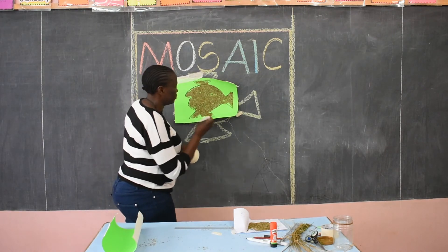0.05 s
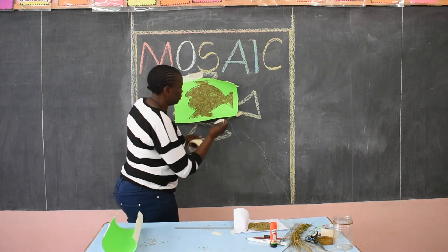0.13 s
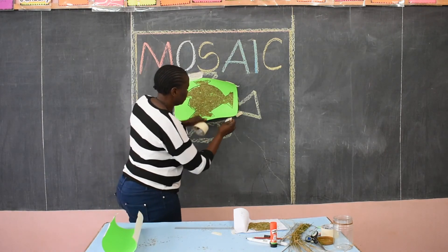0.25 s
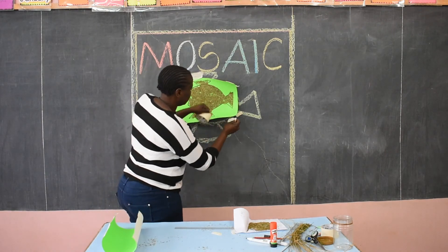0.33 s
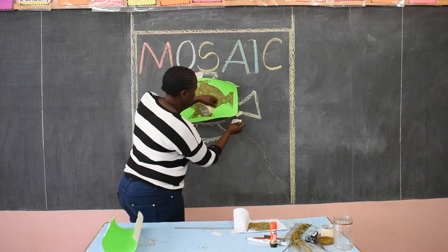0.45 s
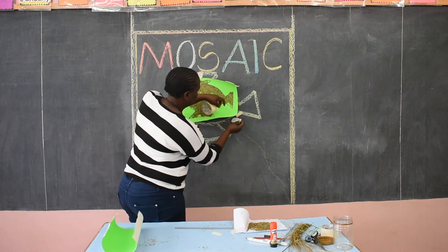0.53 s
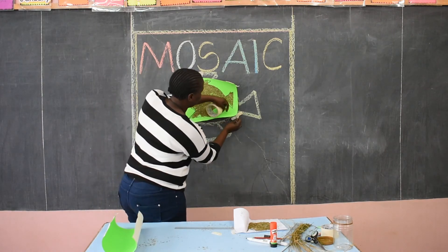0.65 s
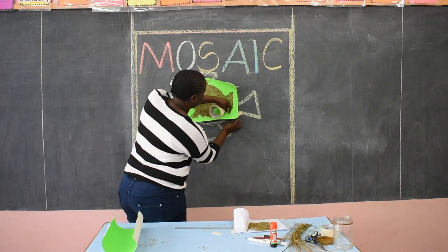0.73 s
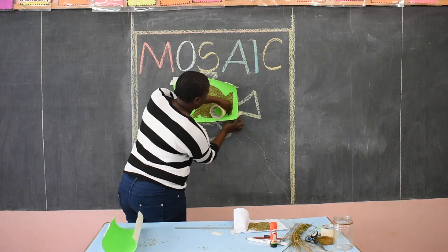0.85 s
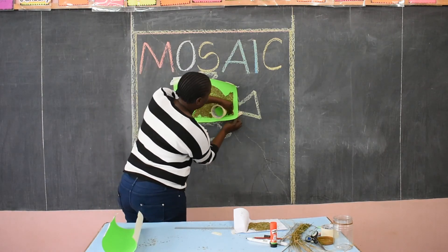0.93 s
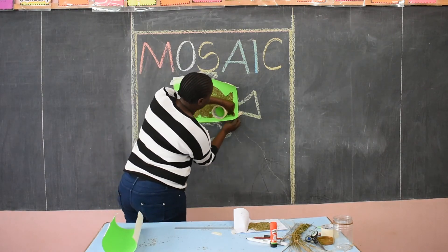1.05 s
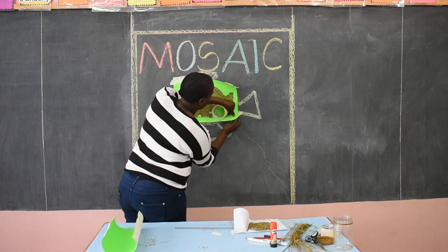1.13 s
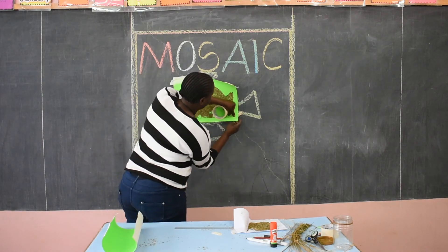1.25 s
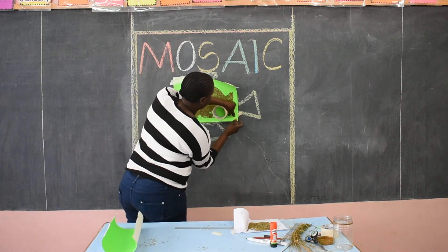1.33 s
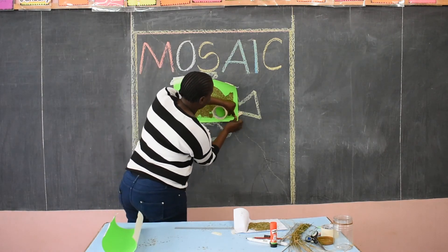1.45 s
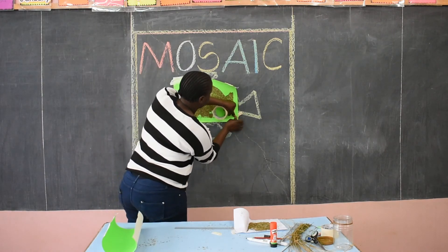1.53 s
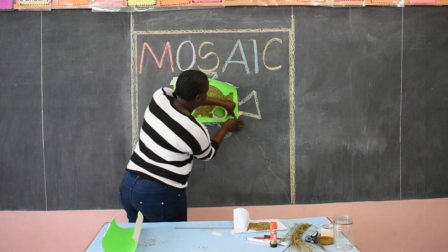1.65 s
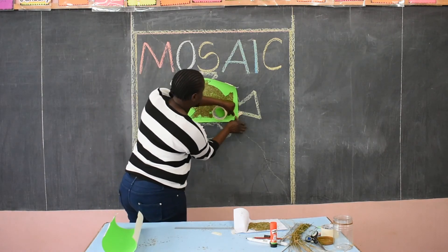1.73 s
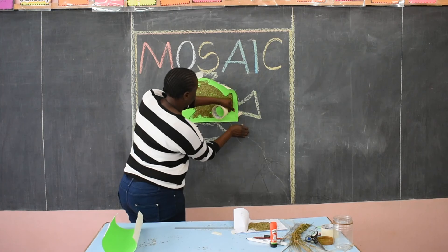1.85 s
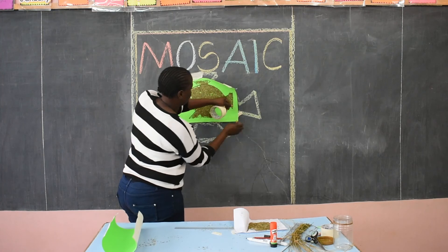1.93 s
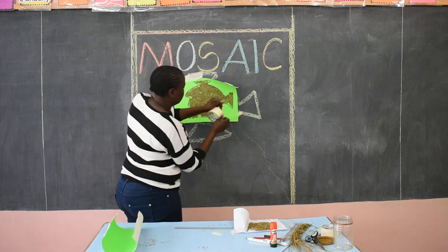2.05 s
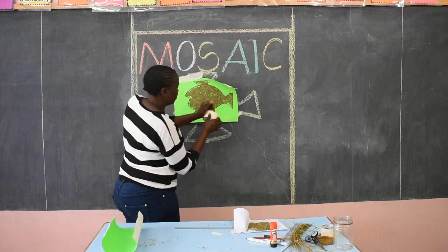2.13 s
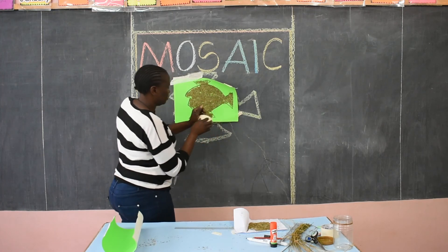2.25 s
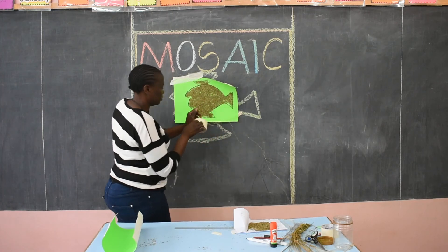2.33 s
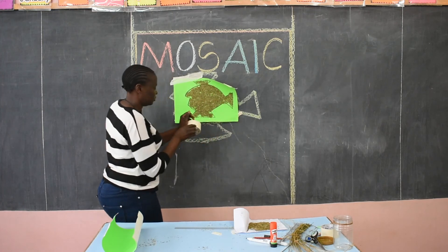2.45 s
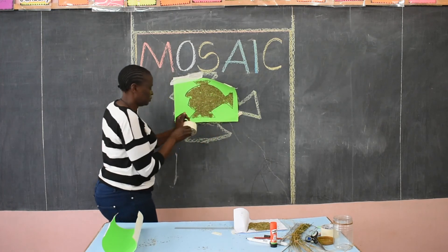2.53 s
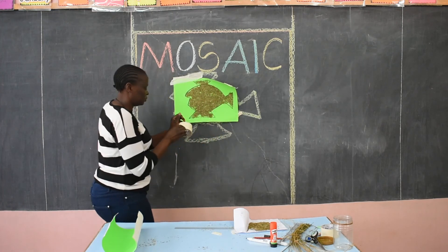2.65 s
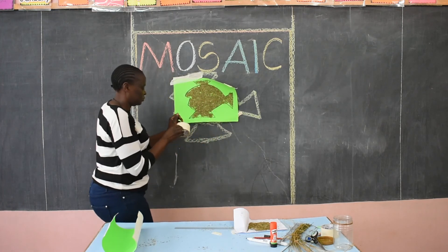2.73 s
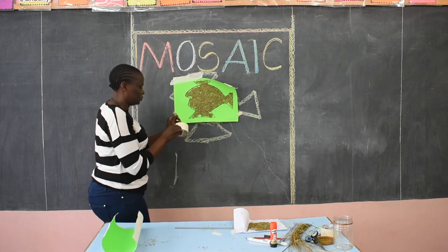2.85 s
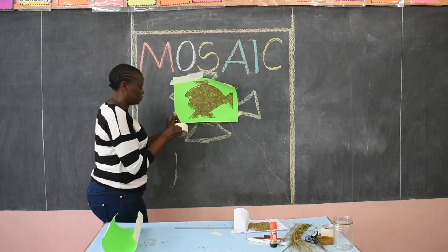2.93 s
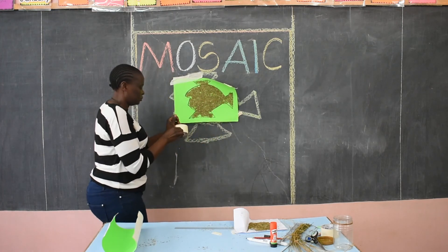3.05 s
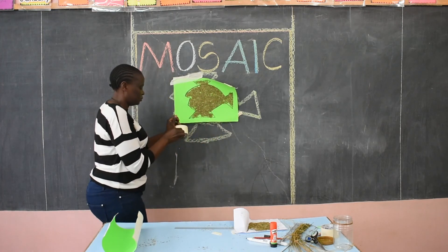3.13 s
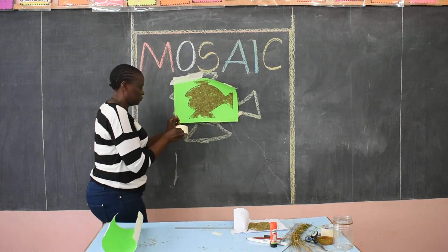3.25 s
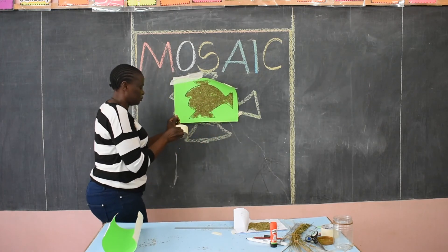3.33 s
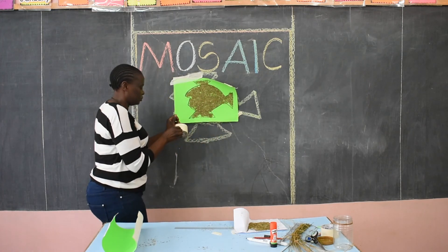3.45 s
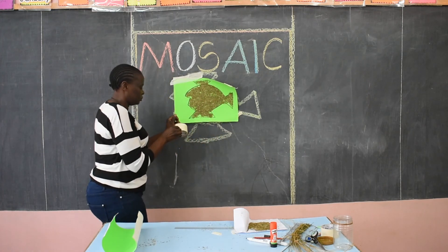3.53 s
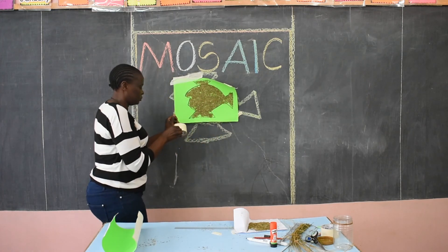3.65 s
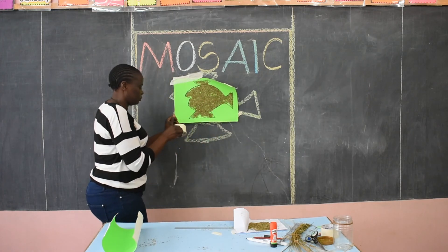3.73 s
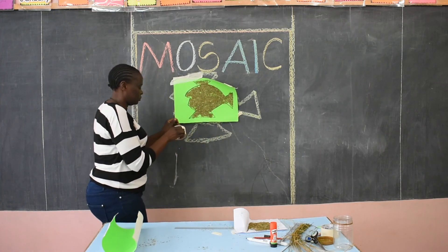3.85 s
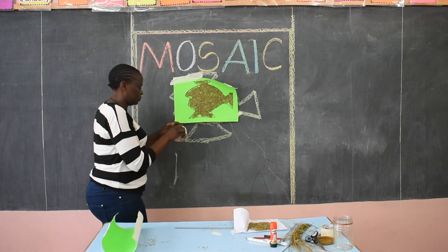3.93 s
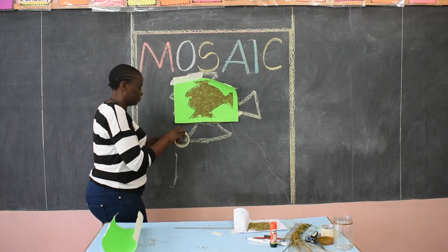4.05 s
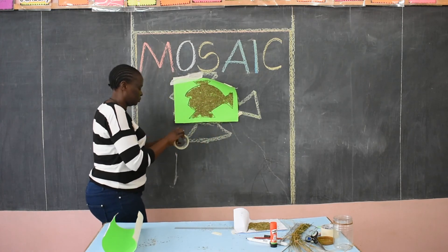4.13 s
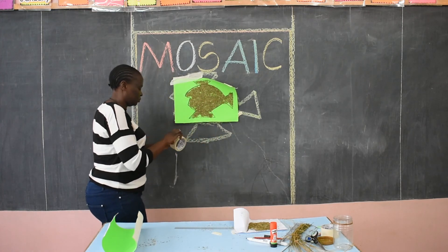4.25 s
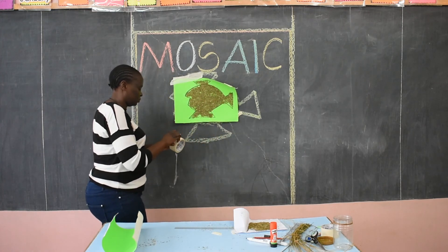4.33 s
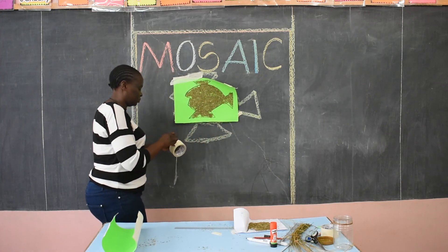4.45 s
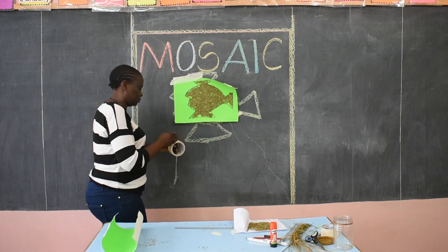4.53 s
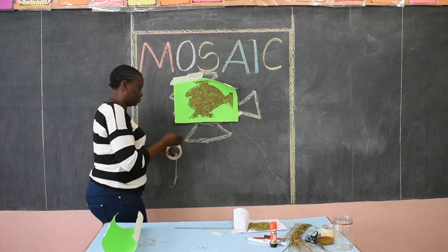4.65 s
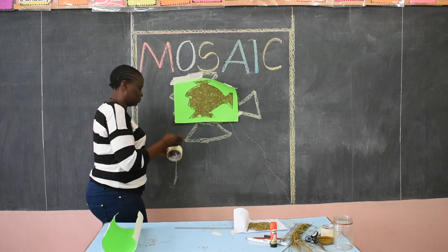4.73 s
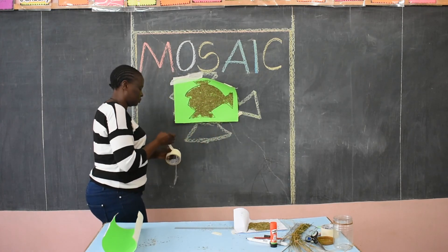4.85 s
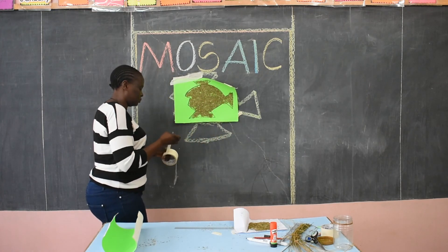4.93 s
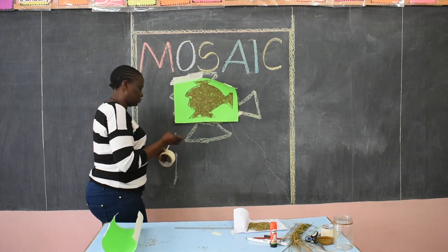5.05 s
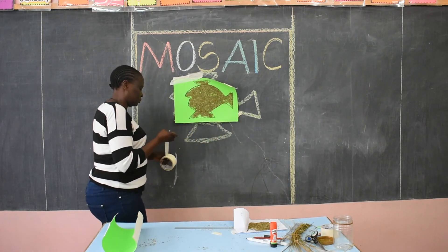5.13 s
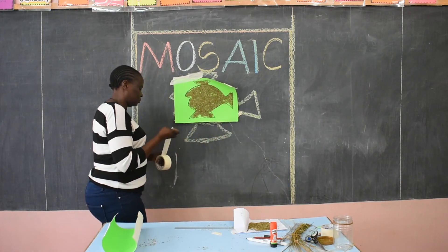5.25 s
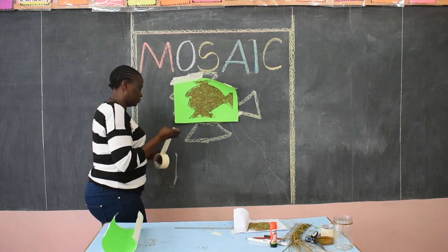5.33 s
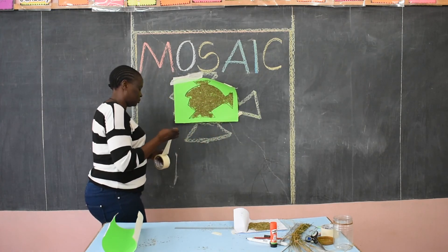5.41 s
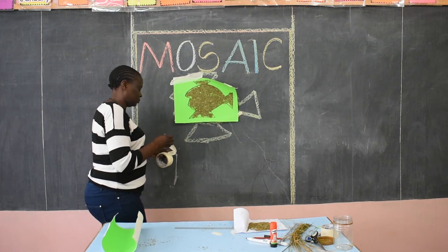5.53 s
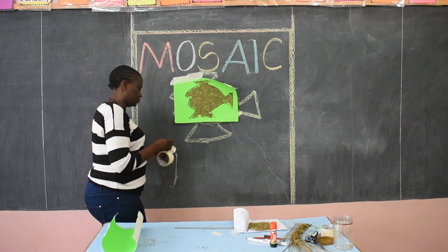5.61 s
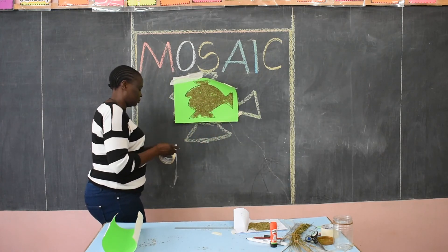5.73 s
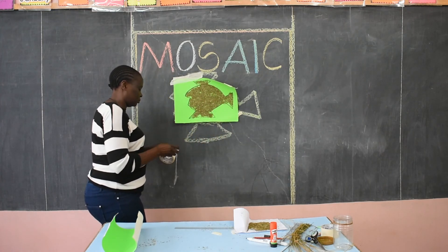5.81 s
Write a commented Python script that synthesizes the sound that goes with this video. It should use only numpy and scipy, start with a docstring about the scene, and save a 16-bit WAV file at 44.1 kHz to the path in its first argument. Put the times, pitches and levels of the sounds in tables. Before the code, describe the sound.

Masking tape is handled at a blackboard in a quiet, bare classroom, heard through one microphone a few metres away. It opens with a tiny peel and a couple of ticks. From about 0.6 to 2 seconds, fingers press tape onto a paper poster with soft crackles and ticks, and the paper buckles in hollow snaps, strongest between 1.1 and 1.5 seconds. A lull follows, with faint scuffs on the board, a tick at 3.2 and a clearer bump at 3.8. From 4.2 seconds the tape peels off its roll in short, bright, crackly rips, strongest near 4.4, 4.8 and 5.1 to 5.3. The taut strip snaps sharply at about 5.15 and 5.4, and a softer pull with a tick comes near 5.8. Each sound rings briefly in the room, over soft air and a faint, wavering low hum.

```python
"""Classroom, at the blackboard: masking tape is pressed onto a paper poster, crackled, then pulled off
its roll in short rips. Glue threads snap by the thousand and shake the free strip; taut tape and paper
buckle with single snaps; hands bump the board. The board throws each sound straight back, the bare room
rings on, and a faint drone hums behind. One microphone, a few metres off."""
import sys
import numpy as np
from scipy import signal
from scipy.fft import rfft, irfft
from scipy.io import wavfile
from scipy.ndimage import uniform_filter1d

SR = 44100
rng = np.random.default_rng(int(sys.argv[2]) if len(sys.argv) > 2 else 0)


def wav_record(signal):
    """Record a signal, one row per channel, as 16-bit PCM in the file named by sys.argv[1]."""
    frames = np.transpose(np.atleast_2d(signal))
    bounded = np.clip(frames, -1, 1)
    # unit amplitude maps onto the largest positive 16-bit level
    quanta = np.round(bounded * 32767).astype(np.int16)
    wavfile.write(sys.argv[1], SR, quanta)


N = 259308
TOP_HZ, TAPS = 16100, 1024
FREQS_HZ = np.arange(TAPS // 2 + 1) * SR / TAPS
TIME_S = np.arange(N) / SR
CREEP_THREADS_PER_S, RIP_THREADS_PER_S = 1800, 6000

# spectrum of peeling tape: freq_hz, relative_db
TAPE_SPECTRUM = [(30, -68), (70, -44), (150, -31), (210, -16.5), (500, -12), (1000, -8.5), (1700, -2),
                 (3200, -1), (5500, 1), (9000, 1), (11500, -5), (15500, -13)]


def undb(db):
    """Decibels to gain."""
    return 10 ** (np.asarray(db) / 20)


def unit(x):
    """Scale to rms 1."""
    return x / np.sqrt(np.mean(x ** 2))


def lookup(table, hz):
    """Interpolate (freq_hz, value) rows on a log-frequency axis."""
    points_hz, values = np.transpose(table)
    return np.interp(np.log(np.maximum(hz, 1)), np.log(points_hz), values)


def add(track, start_s, sound):
    """Mix a sound into the track."""
    start = max(int(start_s * SR), 0)
    part = sound[:max(N - start, 0)]
    track[start:start + len(part)] += part


def resonance(hz, height_db, q):
    """Steep-sided resonance curve in dB."""
    detune = q * (FREQS_HZ / hz - hz / np.maximum(FREQS_HZ, 1))
    bell = 1 / (1 + detune ** 2) ** 2
    return 10 * np.log10(1 + (undb(height_db) ** 2 - 1) * bell)


def above(hz):
    """Smooth step from 0 below hz to 1 above."""
    return 1 - 1 / (1 + (FREQS_HZ / hz) ** 4)


def response(colour_db):
    """Causal, unit-energy impulse response of a gain curve."""
    cepstrum = irfft(np.log(undb(colour_db)))
    cepstrum[TAPS // 2:] = 0
    taps = irfft(np.exp(2 * rfft(cepstrum)))
    return taps / np.linalg.norm(taps)


def wander(n, rate_hz):
    """Random values joined by straight lines."""
    place = np.arange(n) / SR * rate_hz
    steps = rng.standard_normal(N // 10)
    return np.interp(place, np.arange(len(steps)), steps)


def grains(n, per_s, spread_db):
    """Tiny pops at random moments, a few much larger than the rest."""
    fires = rng.random(N)[:n] < per_s / SR
    size = undb(spread_db * np.clip(rng.standard_normal(N)[:n], -2, 2))
    sign = rng.choice([-1, 1], N)[:n]
    return unit(fires * sign * size + 1e-9)


def decay(fade_s, n=SR // 10):
    """Exponential fade from 1."""
    return np.exp(-np.arange(n) / SR / fade_s)


def stroke(length_s, rise_s, start_db, slope_db_per_s, release_s, edge_s):
    """Gain of one hand movement: gathers speed, holds on a slope, stops."""
    t = np.arange(int((length_s + 5 * release_s) * SR)) / SR
    level_db = start_db * np.maximum(1 - t / rise_s, 0) + slope_db_per_s * np.maximum(t - rise_s, 0)
    release = np.exp(-np.maximum(t - length_s, 0) / release_s)
    return undb(level_db) * np.minimum(t / edge_s, 1) * release


def tape_colour(body_db, treble_db):
    """Tape gain curve in dB; a longer free strip radiates more body."""
    tape_db = lookup(TAPE_SPECTRUM, FREQS_HZ)
    return tape_db + body_db * (1 - above(hz=1600)) + treble_db * above(hz=6500)


def threads(gain, colour_db, per_s=CREEP_THREADS_PER_S):
    """Glue threads snap in uneven flurries."""
    flurries = unit(undb(2.2 * wander(len(gain), rate_hz=252)))
    pops = grains(len(gain), per_s, spread_db=4.5)
    return signal.fftconvolve(pops * flurries * gain, response(colour_db))


def snap(colour_db, smear_s=0.001145):
    """A stiff sheet cracks and rings; bending waves carry the treble fastest and smear the crack."""
    # spectrum of a crack: freq_hz, relative_db
    crack_spectrum = [(150, -18), (600, -11), (1500, 2), (3500, 3), (6000, -1.5), (10000, -4.5),
                      (15500, -17)]
    delay_s = smear_s * np.maximum(1 - FREQS_HZ / TOP_HZ, 0)
    dispersion = np.exp(-2j * np.pi * np.cumsum(delay_s) * SR / TAPS)
    crack = response(lookup(crack_spectrum, FREQS_HZ) + colour_db)
    return irfft(rfft(crack) * dispersion) / np.abs(crack).max()


def background(air_db=-52.5, drone_trim_db=-5, hum_waver_db=4.5):
    """Soft room air, a low drone wavering in pitch and level, a thin hum of steady pitch."""
    # room air: freq_hz, relative_db
    air_spectrum = [(15, -67), (25, -30), (75, -10), (150, -4), (235, -6.5), (300, -10.5), (560, -12),
                    (870, -16.5), (2800, -20.5), (6000, -25.5), (10500, -30), (16000, -39.5)]
    # course of the drone: time_s, pitch_hz, relative_db
    drone_path = [(0.3, 143, -57.5), (.55, 143, -51.5), (0.902, 143, -50), (1.052, 149, -57),
                  (1.9, 152.3, -53), (2.1, 168, -52.5), (2.35, 169, -49.5), (2.5, 150, -67),
                  (3.3, 143, -52.5), (3.6, 150, -56), (5.88, 145, -69)]
    # hum tones: pitch_hz, level_db
    hum_tones = [(301, -64.5), (701, -67), (802, -71.5)]
    air_colour = undb(lookup(air_spectrum, np.arange(N // 2 + 1) * SR / N))
    air = unit(irfft(rfft(rng.standard_normal(N)) * air_colour, N))
    times_s, pitches_hz, levels_db = np.transpose(drone_path)
    drone_hz = np.interp(TIME_S, times_s, pitches_hz) + 2.71 * wander(N, rate_hz=4.5)
    drone_gain = undb(np.interp(TIME_S, times_s, levels_db) + drone_trim_db)
    drone = drone_gain * unit(np.sin(2 * np.pi * np.cumsum(drone_hz) / SR))
    hum = np.zeros(N)
    for pitch_hz, level_db in hum_tones:
        tone = unit(np.sin(2 * np.pi * pitch_hz * TIME_S))
        hum += tone * undb(level_db + hum_waver_db * wander(N, rate_hz=5.61))
    return air * undb(air_db + 0.5 * wander(N, rate_hz=4.27)) + drone + hum


def reflections(tail_db=2, build_s=0.009, echo_top_hz=11000, delay_jitter=0.1):
    """Room response for one hand position: dulled echoes, then a tail whose treble dies first."""
    # ring of the room: freq_hz, t60_s
    ring_times = [(150, 1.0), (500, 0.81), (1400, 0.58), (2400, 0.46), (3800, 0.52), (8000, 0.43),
                  (15000, 0.28)]
    # floor, table and side wall: delay_s, gain
    room_echoes = [(.0058, 0.17), (.009, 0.22), (0.0229, 0.2)]
    board_echo = (0.003, 0.85)
    t, freqs_hz = np.arange(SR) / SR, np.arange(SR // 2 + 1)
    noise_spectrum = rfft(rng.standard_normal(SR))
    early, tail = np.zeros(SR), np.zeros(SR)
    centres_hz = np.geomspace(100, 16000, num=12)
    for centre_hz, weights in zip(centres_hz, np.eye(len(centres_hz))):
        band = irfft(noise_spectrum * lookup(np.c_[centres_hz, weights], freqs_hz))
        tail += band * undb(-60 * t / lookup(ring_times, centre_hz))
    tail *= np.minimum(t / build_s, 1) ** 2
    for delay_s, gain in [board_echo] + room_echoes:
        early[int(delay_s * (1 + delay_jitter * rng.uniform(-1, 1)) * SR)] += gain
    early = signal.lfilter(*signal.butter(1, echo_top_hz, fs=SR), early)
    return early + undb(tail_db) * tail / np.linalg.norm(tail)


def classroom(direct, positions=7, switch_hz=60):
    """The hands keep moving, so the sound meets several sets of reflections in turn."""
    position = (TIME_S * switch_hz).astype(int) % positions
    out = direct.copy()
    for k in range(positions):
        share = uniform_filter1d((position == k).astype(float), size=64)
        out += signal.fftconvolve(direct * share, reflections())[:N]
    return out


def board_bumps(loud_db=-33, dulling_db_per_db=0.45):
    """Hands and roll scuff the dull board; softer bumps have less treble."""
    # contacts: start_s, level_db, swell_s, fade_s, ring_hz, ring_db
    bumps = [ (.721, -41.5, .012, 0.022, 383, 14.5), (1.269, -41, 0.005, 0.018, 820, 11.5),
             (2.29, -61, 0.019, 0.1, 334, 35), (2.62, -52.5, 0.24, 0.061, 900, 6),
             (2.78, -41.5, 0.028, .011, 920, 10.5), (2.79, -49.5, 0.014, 0.02, 248, 27),
             (3.838, -29, .0087, 0.025, 2300, -1)]
    # spectrum of the board: freq_hz, relative_db
    board_spectrum = [(30, -63), (70, -8), (150, -19.5), (290, -4.5), (500, 1), (1400, -2.5), (2300, 0.5),
                      (3600, -8.5), (8000, -12.5), (15500, -28)]
    out, t = np.zeros(N), np.arange(SR // 2) / SR
    for start_s, level_db, swell_s, fade_s, ring_hz, ring_db in bumps:
        force = np.sqrt(np.minimum(t / swell_s, 1)) * np.exp(-np.maximum(t - swell_s, 0) / fade_s)
        scuff = force * grains(len(t), per_s=3200, spread_db=3)
        treble_db = -2.5 + dulling_db_per_db * (level_db - loud_db)
        colour_db = lookup(board_spectrum, FREQS_HZ) + resonance(ring_hz, ring_db, q=3.7)
        colour_db += treble_db * above(hz=1450)
        add(out, start_s, undb(level_db) * signal.fftconvolve(scuff, response(colour_db)))
    return out


def finger_rubs():
    """Fingers press the tape down; it crackles softly against the paper."""
    # strokes: start_s, length_s, level_db, treble_db, ring_hz
    rubs = [ (0.61, 0.21, -50.5, -9, 4870), (.828, 0.048, -34, -9.5, 3020), (0.932, 0.08, -51, 2, 2380),
            (1.107, 0.041, -47.5, -16, 2380), (1.16, .035, -34.5, -26, 3020),
            (1.197, 0.042, -38, -6.5, 2390), (1.686, 0.048, -49, -16, 2600),
            (1.788, 0.057, -48.5, -15, 2570), (1.832, 0.043, -51, 6, 8000), (4.01, 0.031, -55, 16, 9500)]
    out = np.zeros(N)
    for start_s, length_s, level_db, treble_db, ring_hz in rubs:
        press = stroke(length_s, rise_s=0.024, start_db=-0.5, slope_db_per_s=5,
                       release_s=0.0055, edge_s=0.00067)
        colour_db = tape_colour(body_db=2.5, treble_db=treble_db)
        colour_db += resonance(ring_hz, height_db=2.5, q=2.4)
        add(out, start_s, threads(undb(level_db) * press, colour_db))
    return out


def poster_buckles():
    """Paper buckles under the fingers: a hollow snap, always the same ring, then a brief crinkle."""
    # buckles: start_s, snap_db, crinkle_db
    buckles = [(0.9699, -21, -55), (1.163, -11, -54), (1.2688, -10.5, -28), (1.4388, -23.5, -40),
               (1.487, -6, -32)]
    snap_colour_db = resonance(hz=2400, height_db=17.5, q=3.2) - 3.5 * above(hz=6500)
    crinkle_colour_db = tape_colour(body_db=3, treble_db=-8.5)
    out = np.zeros(N)
    for start_s, snap_db, crinkle_db in buckles:
        add(out, start_s, undb(snap_db) * snap(snap_colour_db))
        add(out, start_s, threads(undb(crinkle_db) * decay(fade_s=0.015), crinkle_colour_db))
    return out


def tape_ticks(bass_db=-5.5, threads_db=-18):
    """Taut tape ticks as it creases or tears; a few glue threads give way after it."""
    # ticks: start_s, level_db, ring_hz, ring_db
    ticks = [ (.208, -24, 4350, 23), (.216, -16.5, 7460, 19), (0.608, -32.5, 8200, 19),
             (0.684, -27.5, 7500, 6), (.773, -22.5, 10200, 8), (.836, -14.5, 3500, 3), (.852, -14, 3280, 8),
             (1.616, -31, 9400, 7), (1.768, -23.5, 3530, 12), (1.823, -22, 5400, 5), (1.956, -25, 8150, 5),
             (3.2, -30, 2600, 7.5), (3.845, -28, 4400, 20), (4.032, -27, 9400, 1), (5.117, -14, 5000, -3),
             (5.15, -3, 5000, 21), (5.198, -14, 2980, 16), (5.3768, -6.5, 6500, 13), (5.4, -19, 6000, 10),
             (5.791, -15.5, 3180, 1)]
    out = np.zeros(N)
    for start_s, level_db, ring_hz, ring_db in ticks:
        colour_db = resonance(ring_hz, ring_db, q=1.6) + bass_db * (1 - above(hz=0.22 * ring_hz))
        add(out, start_s, undb(level_db) * snap(colour_db))
        thread_gain = undb(level_db + threads_db) * decay(fade_s=0.0057)
        add(out, start_s, threads(thread_gain, lookup(TAPE_SPECTRUM, FREQS_HZ) + colour_db))
    return out


def tape_pulls(rip_db=-19, roll_hz=223):
    """Glue lets go with a bright spit; threads, denser with speed, shake the strip and hollow roll."""
    # slow creeps and fast rips: start_s, length_s, rise_s, level_db, spit_db, body_db, ring_hz, ring_db
    pulls = [ (0, 0.021, 0.00071, -29.5, -3, 3, 4300, 6), (4.21, 0.061, 0.025, -35.5, 9.5, -0.5, 2630, 2.5),
             (4.277, 0.044, 0.0095, -43.5, 4, -6, 2510, 12), (4.334, 0.036, 0.0037, -38, 5, -7, 4900, -7),
             (4.375, 0.073, 0.044, -20, -5, -4.5, 4870, 3.5), (4.507, 0.078, 0.01, -38, -4, 9, 4620, -15),
             (4.699, 0.16, .005, -38.5, -18, 1.5, 6130, -0.5), (4.774, 0.13, 0.015, -19, -3, -2, 3150, 3),
             (5.075, 0.14, 0.047, -19, 2, 2.5, 3120, 3), (5.212, .044, 0.0072, -18.5, -8, 0.5, 2930, 8),
             (5.714, .035, 0.0045, -43, -4, -8, 6090, 4), (5.75, 0.088, 0.029, -38, -15, 10.5, 3160, 14)]
    spit_colour_db = lookup(TAPE_SPECTRUM, FREQS_HZ) + 21.5 * above(hz=7500)
    out = np.zeros(N)
    for start_s, length_s, rise_s, level_db, spit_db, body_db, ring_hz, ring_db in pulls:
        gain = undb(level_db) * stroke(length_s, rise_s, start_db=-12, slope_db_per_s=-29,
                                       release_s=0.0022, edge_s=0.0018)
        speed = undb(level_db - rip_db)
        threads_per_s = np.interp(speed, [0, 1], [CREEP_THREADS_PER_S, RIP_THREADS_PER_S])
        roll_db = max(7 + 0.9 * (level_db + 16.5), 0)  # only fast rips ring the roll
        colour_db = tape_colour(body_db, treble_db=-2.5) + resonance(ring_hz, ring_db, q=2.44)
        colour_db += resonance(roll_hz, roll_db, q=0.95)
        add(out, start_s, threads(gain, colour_db, threads_per_s))
        spit_gain = gain * undb(spit_db) * decay(fade_s=0.029, n=len(gain))
        add(out, start_s, threads(spit_gain, spit_colour_db, RIP_THREADS_PER_S))
    return out


def scene():
    """One microphone, alike in both channels."""
    handling = tape_pulls() + finger_rubs() + poster_buckles() + tape_ticks() + board_bumps()
    mono = classroom(handling) + background()
    return np.array([mono, mono])


def record(dry):
    """Clip just under full scale, then cut the top."""
    lowpass = signal.ellip(10, 0.1, 80, TOP_HZ, fs=SR, output="sos")
    return signal.sosfilt(lowpass, np.clip(dry, -0.85, 0.85))


dry = scene()
out = record(dry)
wav_record(out)
```